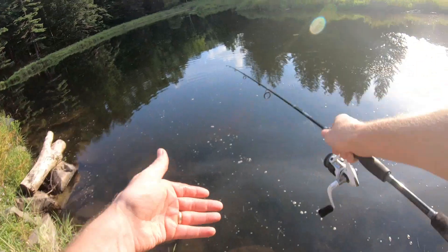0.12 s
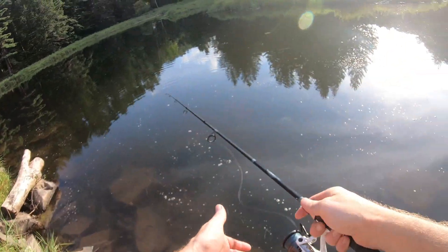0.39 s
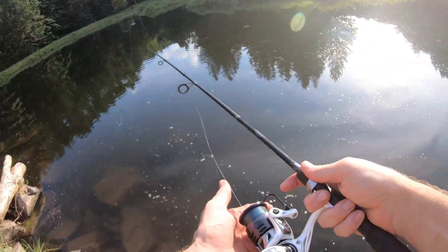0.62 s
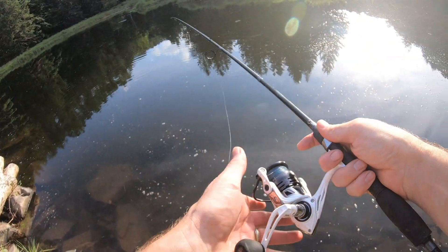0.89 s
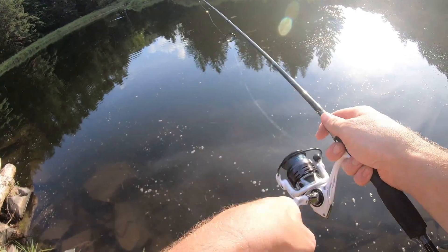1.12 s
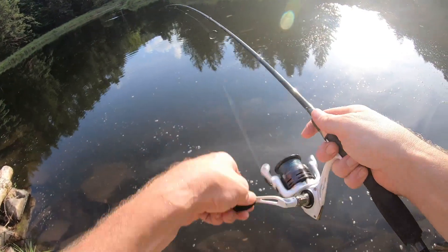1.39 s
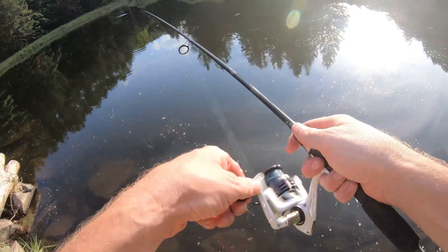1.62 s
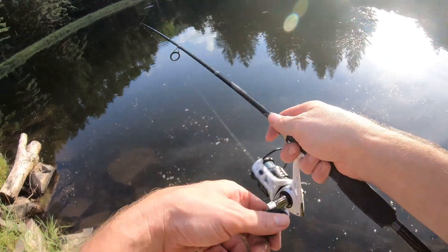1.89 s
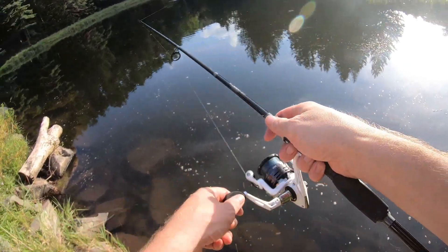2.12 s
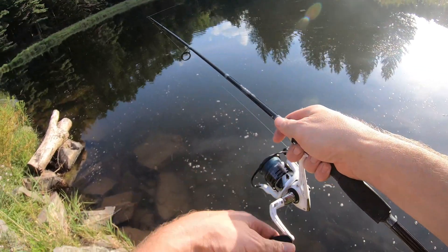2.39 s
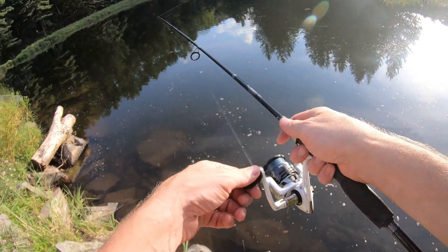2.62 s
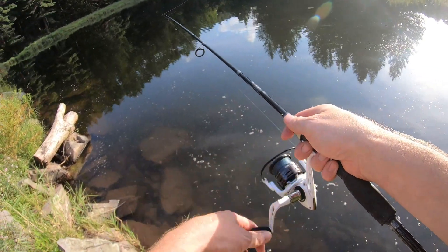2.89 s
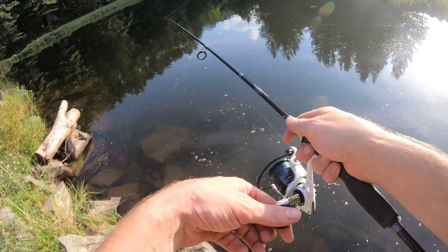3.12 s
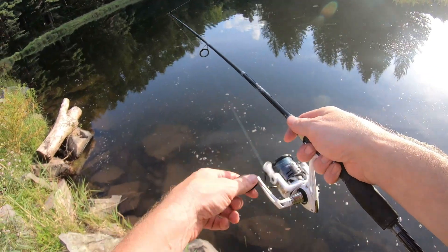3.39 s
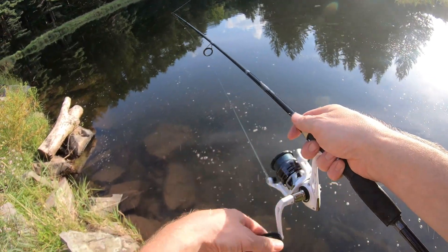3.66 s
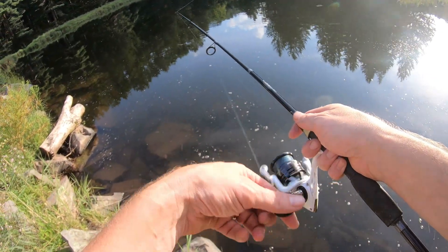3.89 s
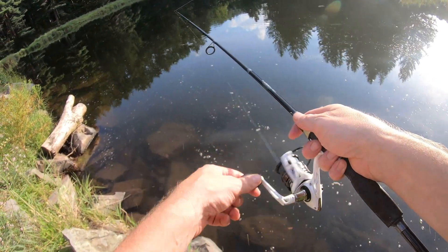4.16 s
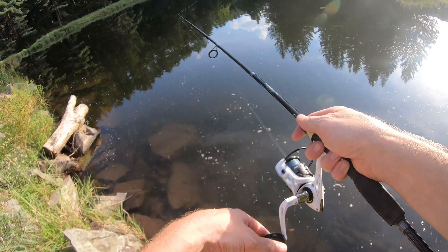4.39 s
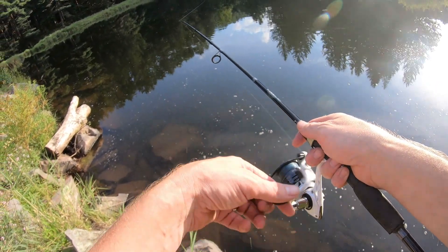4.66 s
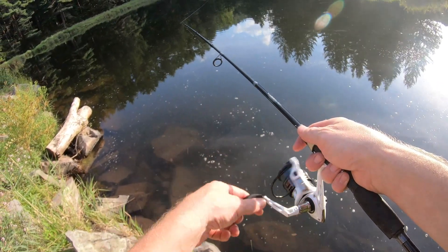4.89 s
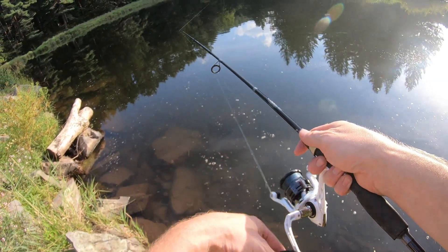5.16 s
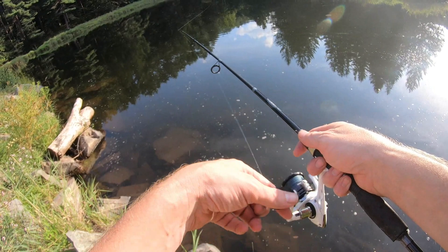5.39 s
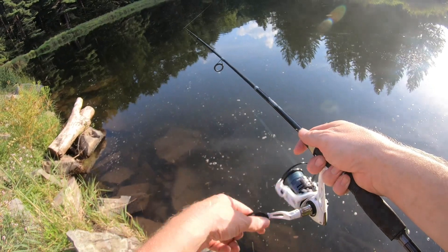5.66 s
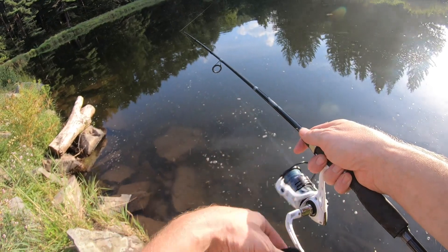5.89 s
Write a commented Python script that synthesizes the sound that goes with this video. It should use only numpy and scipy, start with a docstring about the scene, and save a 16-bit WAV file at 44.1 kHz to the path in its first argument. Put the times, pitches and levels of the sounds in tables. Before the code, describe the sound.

A close, slightly muffled stereo pickup worn by an angler at a quiet pond. Soft line hiss and small clicks lead to a hard cluster of bail clacks and a dull thump on the housing. Slack line scrapes over the roller, the handle snaps a few times, and the reel settles into steady rough whirring. Tiny drops plink on the water later, over pulsing high insect song and a low far hum.

```python
"""Still water: insects throb high up and a far engine hums, as narrow tones and shaped noise, amid background noise
and cloth rub. An angler lets hissing line run off a spinning reel, then the bail squeaks and snaps shut in noisy clicks,
with thumps on the body-worn housing made of decaying modes. Slack line rasps over the roller in gliding bands as
winding begins. Gears and line roller whirr on to the end as rubbing grains through the reel's modes, while parts tick
and, from the middle on, drops fall on the water as short tones rising in pitch."""
import sys
import numpy as np
from scipy import signal
from scipy.fft import rfft, irfft
from scipy.io import wavfile

SR = 44100
rng = np.random.default_rng(int(sys.argv[2]) if len(sys.argv) > 2 else 0)


def transcribe(signal):
    """Save signal, clipped to [-1, 1], as a 16-bit WAV file at the path in sys.argv[1]."""
    frames = np.atleast_2d(signal).T
    limited = np.clip(frames, -1, 1)
    pcm = np.round(limited * 32767).astype(np.int16)
    wavfile.write(sys.argv[1], SR, pcm)


def amplitude_ratio(level_db):
    """Convert a level in decibels to the matching linear amplitude (field) ratio."""
    exponent = np.asarray(level_db, float) / 20
    return 10 ** exponent


N = 265923
T = np.arange(N) / SR
HZ = np.maximum(np.fft.rfftfreq(N, 1 / SR), 1)


def rms_one(x):
    """Scale to unit rms."""
    return x / np.sqrt(np.mean(x ** 2) + 1e-20)


def in_time(rows):
    """Columns of a table as signals, straight between rows and held beyond the ends."""
    s, *columns = np.transpose(rows)
    return [np.interp(T, s, c) for c in columns]


def at_hz(points):
    """A spectrum table on the FFT grid, straight in log frequency."""
    hz, value = np.transpose(points)
    return np.interp(np.log(HZ), np.log(np.maximum(hz, 1)), value)


def noise(spectrum, count=2):
    """Unrelated noises of one colour, rms 1."""
    white = rng.standard_normal((count, N))
    return rms_one(irfft(rfft(white) * amplitude_ratio(at_hz(spectrum)), N))


def drift(rate):
    """Slow chance of spread about 1, with 2 * rate new values a second joined by straight lines."""
    steps = rng.standard_normal(400)
    return np.interp(T * rate * 2, np.arange(400), steps) * 1.22  # makes up for the spread lost between steps


def resonance(x, hz, width_hz):
    """Two-pole peak with gain about 1 on top."""
    r = np.exp(-np.pi * width_hz / SR)
    feedback = [1, -2 * r * np.cos(2 * np.pi * hz / SR), r * r]
    return signal.lfilter([(1 - r * r) / 2, 0, (r * r - 1) / 2], feedback, x)


def twice_resonant(x, hz, width_hz):
    """The same peak twice in a row, for steeper skirts."""
    return resonance(resonance(x, hz, width_hz), hz, width_hz)


def wavering(hz, width_hz):
    """Two narrow noises whose centre follows hz, rms 1."""
    band = signal.lfilter([1], [1, -np.exp(-np.pi * width_hz / SR)], rng.standard_normal((2, 2, N)))
    phase = 2 * np.pi * np.cumsum(hz) / SR
    return rms_one(band[0] * np.cos(phase) + band[1] * np.sin(phase))


def dull(x, cut_hz=9300, leak_db=-43.0):
    """The housing's membranes cut the top steeply, leaving a small leak."""
    return signal.sosfilt(signal.butter(6, cut_hz, fs=SR, output="sos"), x) + amplitude_ratio(leak_db) * x


def add(out, s, sound, left_right_db):
    """Place a short sound, panned by level."""
    i = round(s * SR)
    sound = sound[..., :N - i]
    out[:, i:i + sound.shape[-1]] += sound * amplitude_ratio(np.array([[left_right_db / 2], [-left_right_db / 2]]))


# colour of the background noise: (frequency [Hz], relative level [dB])
BACKGROUND_COLOUR = [(20, -36), (60, -39), (200, -20), (500, -16.5), (900, -7.5), (2000, -13.5),
                     (4500, -16.5), (8000, 1.5), (9500, -23), (11000, -65.5), (16000, -70)]


def background_noise():
    """Steady background noise, strongest near 8 kHz."""
    return amplitude_ratio(-67) * noise(BACKGROUND_COLOUR)


# engine orders that fade as two paths through the air fall in and out of step:
# (order [x firing rate], level [dB], fading period [s], time of fullest level [s], fading depth [0-1])
ENGINE_ORDERS = [(2, -68.5, 5.6, 2.8, 0.22), (3, -70.5, 2.8, 4.32, 0.25), (5, -69, 5.8, 0.33, 0.46),
                 (6, -67, 2.44, 2.12, 0.2)]
# weaker engine lines without that fading: (frequency [Hz], level [dB])
ENGINE_LINES = [(72.15, -82), (180.4, -85), (486, -78.5), (505, -85)]
# common swell and sink of the orders above the third: (time [s], added level [dB])
UPPER_ORDERS = [(0, 6), (.7, 3.5), (1.3, -6), (2.1, 0), (3.1, -2), (4.0, -15), (4.8, -6.5), (5.7, -2.5),
                (6.03, -0.5)]


def engine(firing_hz=72.15, waver_db=2.5):
    """Tones of a far engine at fixed pitch; each wavers in level as the air between moves."""
    upper_db, = in_time(UPPER_ORDERS)
    lines = list(ENGINE_LINES)
    for order, db, period_s, fullest_s, depth in ENGINE_ORDERS:
        second_path = np.clip(depth, 0, .97) * np.exp(2j * np.pi * (T - fullest_s) / period_s)
        fading_db = 20 * np.log10(np.abs(1 + second_path) / (1 + depth))
        lines.append((firing_hz * order, db + (order > 4) * upper_db + fading_db))
    out = np.zeros((2, N))
    for hz, db in lines:
        waver = waver_db * np.array([drift(3), drift(2.3)])  # the two ports waver apart
        tone = np.sin(2 * np.pi * hz * T + rng.uniform(0, 2 * np.pi))
        out += np.sqrt(2) * amplitude_ratio(db + waver) * tone
    return out


# bands of the far insects: (centre [Hz], width [Hz], relative level [dB])
CHORUS_BANDS = [(5697, 540, 1), (8180, 750, 2.5)]


def far_chorus(level_db=-62.5, flicker_db=1.4):
    """Many far singers blur into noise bands whose levels flicker a little."""
    white = rng.standard_normal((2, N))
    chorus = np.zeros((2, N))
    for hz, width_hz, db in CHORUS_BANDS:
        chorus += amplitude_ratio(db + flicker_db * drift(15)) * rms_one(twice_resonant(white, hz, width_hz))
    return dull(amplitude_ratio(level_db) * chorus)


# the near singer's loudness: (time [s], level [dB])
NEAR_SINGER = [(0.0, -59), (0.6, -65), (0.95, -56), (1.26, -68.5), (1.9, -60.5), (2.92, -69.5), (3.79, -67),
               (4.35, -62), (6.03, -62)]


def near_insect(centre_hz=8570, fall_hz=390, width_hz=80, duty=.13, flicker_db=2.2):
    """A near singer pulses about twenty times a second, each pulse a narrow noise falling in pitch."""
    near_db, = in_time(NEAR_SINGER)
    pulses_per_s, first_pulse_s = 19.48, .031
    waver_pulses, waver_period_s, fastest_s = .34, 4.2, .35  # the pace wavers slowly about its mean
    waver = waver_pulses * np.sin(2 * np.pi * (T - fastest_s) / waver_period_s)
    pulses = pulses_per_s * (T - first_pulse_s) + waver
    turn = (pulses + .5) % 1 - .5  # -0.5 to 0.5 through each pulse, 0 at its middle
    gate = np.exp(-.5 * (turn / duty) ** 2) * amplitude_ratio(flicker_db * drift(11))
    song = wavering(centre_hz - 2 * fall_hz * turn, width_hz)
    return dull(amplitude_ratio(near_db) * rms_one(gate * song))


# how hard the cloth rubs: (time [s], level [dB])
CLOTH_LEVEL = [(0.0, -60), (0.4, -54), (0.79, -51), (0.98, -59.5), (1.5, -62.5), (3.88, -65), (4.72, -61.5),
               (6.03, -65)]
# colour of the cloth rub: (frequency [Hz], relative level [dB])
CLOTH_COLOUR = [(20, -22), (70, -6), (110, -21), (170, 5.5), (230, -5.5), (350, -11.5), (700, -10),
                (1500, -18), (4000, -44)]


def cloth():
    """Cloth rubbing on the housing: low coloured noise of uneven level."""
    level_db, = in_time(CLOTH_LEVEL)
    return amplitude_ratio(level_db + 1.2 * drift(8)) * noise(CLOTH_COLOUR)


# knocks through the harness: (time [s], level [dB], upper modes' added level [dB], left-right [dB])
THUMPS = [(0.259, -44.5, -5, -5), (0.567, -52, -17, 3), (0.773, -49, 16.5, -0.5), (0.882, -23.5, 2.5, 2.5),
          (0.896, -27, -3.5, -8), (0.984, -54, -15, -1), (1.233, -56, 12, -1.0), (1.287, -56.5, 7.5, 4),
          (1.562, -53.5, -19, 4), (1.664, -59, -2, -14), (1.803, -54, 1.5, -3), (2.153, -56, -2, 0.5),
          (2.36, -57, 1, -16), (3.07, -58, -16, -18), (3.771, -64, 0, -17)]
# low and upper modes of the housing: (frequency [Hz], relative level [dB], 60 dB decay [s])
HOUSING_LOW = [(29.8, -3.5, .18), (44, -1, .14), (71, -7, 0.12), (95, -4.5, 0.16)]
HOUSING_HIGH = [(164, -10.5, 0.075), (221.5, 5, 0.05), (303.6, -7, 0.11), (383, -14, 0.053),
                (686, -10.5, 0.036)]


def thumps(push_ms=3.8, unlike_rad=1.6):
    """Soft pushes on the housing ring its low and upper modes, in different phase at each port."""
    out, t = np.zeros((2, N)), T[:12000]
    for s, db, high_db, left_right_db in THUMPS:
        modes = HOUSING_LOW + [(hz, d + high_db, t60) for hz, d, t60 in HOUSING_HIGH]
        swell = 1 - np.exp(-t * 1000 / push_ms)
        ring = np.zeros((2, len(t)))
        for hz, mode_db, t60 in modes:
            phase = unlike_rad * rng.uniform(0, 1, (2, 1))
            ring += amplitude_ratio(mode_db - 60 * t / t60) * np.sin(2 * np.pi * hz * t + phase)
        add(out, s, amplitude_ratio(db) * swell * ring, left_right_db)
    return out


# drops on the water: (time [s], level [dB], bubble pitch [Hz], passed on the way up)
DROPS = [(2.428, -52, 482), (3.235, -52, 640), (3.834, -56, 1400), (3.88, -70, 479), (3.924, -63, 1444),
         (4.024, -57, 1627), (4.072, -53, 1440), (4.116, -55, 1410), (4.166, -52, 1538), (4.339, -56, 1292),
         (4.606, -57, 1570), (5.01, -50, 639), (5.179, -52, 1660)]


def drops(cycles_at_1400=16.82, rise=0.48):
    """Each trapped bubble rings some cycles and dies away, rising in pitch from three quarters of its table pitch."""
    out, t = np.zeros((2, N)), T[:4000]
    for s, db, hz in DROPS:
        turns = hz * t
        cycles = cycles_at_1400 * np.sqrt(hz / 1400)  # big bubbles ring for fewer cycles
        phase = 2 * np.pi * turns * (0.75 + rise * turns / cycles)
        envelope = np.minimum(turns / 2, 1) * np.exp(-3 * turns / cycles)
        # 2.5 dB makes up for the decay during the onset
        add(out, s, amplitude_ratio(db + 2.5) * np.sin(phase) * envelope, -2.0)
    return out


# the bail spring's squeak: (time of peak [s], level [dB], pitch [Hz], spread of the bell [s])
SQUEAK = (.727, -56, 3800, .008)


def squeak():
    """The bail spring gives one short tone under a bell-shaped swell, its pitch edging up."""
    out, t = np.zeros((2, N)), T[:4000]
    s, db, hz, spread_s = SQUEAK
    bell = np.exp(-.5 * ((t - 3 * spread_s) / spread_s) ** 2)
    tone = np.sin(2 * np.pi * hz * t * (1 + .4 * t))
    add(out, s - 3 * spread_s, amplitude_ratio(db) * bell * tone, -4.0)
    return out


# ticks of bail, roller and handle:
# (time [s], level [dB], centre [Hz], bright snap over click [dB], left-right [dB])
TICKS = [(0.182, -43, 1200, -15, -7), (0.3729, -38.5, 1770, 4, 7), (0.3832, -38, 2810, -6, 5),
         (0.4402, -43, 2330, -13, 5), (0.4513, -41.5, 2640, -10, 6), (0.633, -39, 3300, -17, -4),
         (0.7593, -23.5, 3620, 15.5, -9.5), (0.7712, -15.5, 4220, -3, -8), (0.7729, -19, 3050, 7.5, -9),
         (0.7773, -29.5, 1190, 4, -11.5), (0.7867, -25, 3640, 0, -2), (0.791, -29, 3450, 5.5, 2),
         (0.808, -34, 3890, -2, -6), (0.8424, -48.5, 1020, 6, -13), (0.8453, -27.5, 3950, -10, -8.5),
         (0.879, -41, 1530, 3, -13), (0.8829, -31, 870, 2.5, 0), (0.8887, -24, 2050, -5, -10),
         (0.8953, -23.5, 1890, -6, 7.5), (0.9068, -32.5, 1870, 7, -7), (0.9395, -45.5, 1220, -10, -2),
         (0.9886, -40, 3680, -13, -4.5), (0.9953, -31, 3470, -17, -7), (1.019, -44.5, 1680, 7.5, -9),
         (1.0775, -40, 3540, -5, -9), (1.241, -48, 1740, 8, -11), (1.3814, -25, 2940, -54, -5),
         (1.6482, -45, 2850, -7, -8), (1.6982, -30.5, 2760, -25, -4), (1.8012, -31.5, 2840, -18, -3),
         (1.8476, -22.5, 3940, -10, -8), (2.349, -36, 1980, -9, 4), (2.4607, -44, 1840, -13, -6),
         (3.2291, -41.5, 3130, -16, -3), (3.6084, -43, 2220, -18, 1), (4.0178, -36, 4940, -31, 1),
         (4.067, -40.5, 4930, -12, -6), (4.2584, -45, 2440, -11, -2), (4.689, -46, 3200, -13, 3),
         (5.0668, -39, 2200, -32, -2), (5.3108, -37, 3320, -23, 4), (5.7215, -37, 3660, -17, 1),
         (5.7651, -43.5, 3140, -16, 1), (5.809, -40.5, 3636, -20, 5), (5.8924, -43, 4650, -17, -3.5)]
# modes of reel frame and spool, also rung by the gears: (frequency [Hz], width [Hz], relative level [dB])
REEL_MODES = [(1228, 220, -5), (1866, 150, -7), (2440, 120, -8.5), (2827, 89, -9), (3140, 87, -3),
              (3940, 3600, -8), (5246, 280, 4.5), (7060, 1370, 4)]


def ticks(sharpness=2.05, modes_db=-9.0, spread_octaves=1.0, snap_hz=7200, snap_width_hz=2500):
    """A short noisy contact: a broad click at its own centre, a bright snap, and the nearest reel modes ringing on."""
    fade_db_per_ms, linger_per_db = 8.5, 0.55  # bright, rattling contacts last longer for each dB of snap
    out, t = np.zeros((2, N)), T[:1500]
    for s, db, centre_hz, snap_db, left_right_db in TICKS:
        white = rng.standard_normal((2, len(t)))
        white[1] = .85 * white[0] + .5 * white[1]  # the ports hear partly different bursts
        fade_db = max(fade_db_per_ms - linger_per_db * snap_db, 3)
        contact = white * amplitude_ratio(-1000 * fade_db * t) * np.minimum(t * SR / 8, 1)
        contact[:, 4] += 4  # the first touch is a hard click
        soften = signal.butter(2, min(1.75 * centre_hz, 9000), fs=SR, output="sos")
        soft = signal.sosfilt(soften, contact)
        width_hz = centre_hz / sharpness
        ring = resonance(resonance(soft, centre_hz, 2 * width_hz), centre_hz, width_hz)
        for k, (hz, mode_width_hz, _) in enumerate(REEL_MODES):
            near = np.exp(-.5 * (np.log2(hz / centre_hz) / spread_octaves) ** 2)
            ring = ring + amplitude_ratio(modes_db) * near * resonance(soft, hz, mode_width_hz) * (-1) ** k
        snap = resonance(resonance(contact, snap_hz, 2 * snap_width_hz), snap_hz, snap_width_hz)
        tick = ring / np.abs(ring).max() + amplitude_ratio(snap_db) * snap / np.abs(snap).max()
        add(out, s, amplitude_ratio(db) * tick, left_right_db)
    return dull(out, cut_hz=10040, leak_db=-14.0)


# slack line dragged over the roller as winding begins: (time [s], main resonance [Hz], level [dB])
SLACK = [(1.36, 2173, -77), (1.448, 2480, -62.5), (1.586, 2230, -65), (1.664, 2600, -70.5),
         (1.73, 2503, -57), (1.868, 2146, -60), (2.03, 2000, -66.5), (2.2, 1770, -68)]


def slack_line(width_hz=260, flicker_db=5.1):
    """Rough resonances glide together with the line's tension, faint before and after the drag."""
    hz, db = in_time(SLACK)
    rough = np.zeros((2, N))
    # (pitch ratio, relative level [dB])
    for ratio, band_db in ((.8, -4.0), (1.0, 0.0), (1.36, -6.0), (2.1, -7.0)):
        rough += amplitude_ratio(band_db + flicker_db * drift(30)) * wavering(ratio * hz, width_hz)
    return dull(amplitude_ratio(db) * rough, cut_hz=6700)


def line_hiss():
    """Bright hiss of unsteady level, strongest near 9.5 kHz."""
    # (frequency [Hz], relative level [dB])
    colour = [(8000, -13), (9500, 3.5), (11000, -6.5), (15500, -10), (16500, -52)]
    return noise(colour) * amplitude_ratio(3.4 * drift(10))


def roller_whistle(hz=7600, width_hz=600):
    """The line roller whistles: a resonant noise band that flickers in level."""
    white = rng.standard_normal((2, N))
    return rms_one(twice_resonant(white, hz, width_hz)) * amplitude_ratio(2.2 * drift(18))


# colour of the broad rub under the modes: (frequency [Hz], relative level [dB])
RUB_COLOUR = [(300, -41), (700, -0.5), (1200, -3.5), (2000, -3.5), (3500, -2.5), (5000, -4), (8000, -1.5),
              (9500, -18), (11000, -58)]


def gear_rub(modes_db=-1.0, patchy_db=2.5, grain_db=5.5, grains_per_s=600, grit_db=24.5, grit_per_s=45.0):
    """Dense rubbing grains excite the reel's modes, each patchy in level, over a broad rub."""
    grain_size = rng.standard_normal(N)[(T * grains_per_s).astype(int)]  # each held for one grain
    grains = rng.standard_normal((2, N)) * amplitude_ratio(grain_db * grain_size)
    catches = rng.random(N) < grit_per_s / SR  # now and then a gear tooth catches
    grains = grains + amplitude_ratio(grit_db) * catches * rng.standard_normal(N)
    modes = np.zeros((2, N))
    for k, (hz, width_hz, db) in enumerate(REEL_MODES):
        ring = twice_resonant(grains, hz, width_hz) / np.sqrt(width_hz)
        modes += amplitude_ratio(db + patchy_db * drift(12)) * ring * (-1) ** k
    return amplitude_ratio(modes_db) * rms_one(modes) + noise(RUB_COLOUR)


# line and gears rubbing: (time [s], gear whirr drive [dB], line hiss level [dB])
WINDING = [(0.0, -70, -74), (0.34, -61, -69.5), (0.56, -67.5, -90), (0.76, -61.5, -99), (0.9, -58.5, -67),
           (1.01, -68, -70), (1.1, -80, -77), (1.3, -65, -98), (1.5, -66, -82), (1.78, -56, -67.5),
           (2.1, -59, -79), (2.55, -63, -80), (2.97, -60.5, -76), (3.3, -63, -84.5), (3.88, -63.5, -83),
           (4.2, -60.5, -81), (4.9, -62, -77.5), (5.36, -63.5, -99), (5.65, -61, -76), (6.03, -63.5, -101)]


def whirr(rotor_per_s=17, beat_db=2.5):
    """Gears, roller and line at work; the load on gears and roller swells once per rotor beat."""
    whirr_db, hiss_db = in_time(WINDING)
    # the whistle is at -61.5 dB when the whirr drive is too, and rises 1.7 dB for each dB of whirr
    roller_db = -61.5 + 1.7 * (whirr_db + 61.5)
    pace = rotor_per_s * (1 + 0.06355 * drift(0.98))
    beat = amplitude_ratio(beat_db * np.cos(2 * np.pi * np.cumsum(pace) / SR))
    turning = amplitude_ratio(whirr_db) * gear_rub() + amplitude_ratio(roller_db) * roller_whistle()
    return dull(turning * beat) + amplitude_ratio(hiss_db) * line_hiss()


# two microphone ports, level: (frequency [Hz], left-right [dB])
PORT_BALANCE = [(60, -0.5), (110, -1.0), (200, 0.2), (380, 0.5), (700, -1.0), (1290, -3.0), (2380, -3.5),
                (4400, -8.0), (8120, -4.0), (15000, -3.0)]
# two microphone ports, phase: (frequency [Hz], lead of the left [rad])
PORT_LEAD = [(0, -1.5), (780, 4), (2150, 0.5), (3010, -0.5), (5000, -1.4), (5770, -2), (7150, 0.2),
             (8440, 1), (10100, -13), (12200, -18), (15400, 31), (16500, 11.6)]
# two microphone ports, shared sound: (frequency [Hz], likeness [0-1])
PORT_LIKENESS = [(60, 1), (230, 0.041), (400, 1), (580, 0.45), (800, 0.55), (1400, 0.33), (2500, 0.59),
                 (3200, 0.69), (4200, 0.56), (5200, 0.78), (6200, 0.49), (7300, 0.32), (8000, 0.045),
                 (8500, 0.45), (10000, 0.19), (14000, .2)]


def ports(pair):
    """The right port hears the left one's sound shifted in phase, mixed with an unrelated share."""
    alike = np.clip(at_hz(PORT_LIKENESS), 0, 1)
    lead = np.interp(HZ, *np.transpose(PORT_LEAD))
    direct, diffuse = rfft(pair)
    right = alike * direct * np.exp(-1j * lead) + np.sqrt(1 - alike ** 2) * diffuse
    side = amplitude_ratio(at_hz(PORT_BALANCE) / 2)
    return irfft(np.array([direct * side, right / side]), N)


def scene():
    """Continuous sounds pass the two ports; short ones carry their own direction."""
    surroundings = background_noise() + engine() + far_chorus() + near_insect() + cloth()
    reel = slack_line() + whirr()
    return ports(surroundings + reel) + thumps() + drops() + squeak() + ticks()


def band_limit(x):
    """A steep low-pass at the top of the band."""
    return signal.sosfilt(signal.butter(12, 16850, fs=SR, output="sos"), x)


def record(dry):
    """A steep low-pass takes off the top of the finished mix."""
    mix = signal.sosfilt(signal.cheby2(10, 40, 16700, fs=SR, output="sos"), dry)
    return band_limit(mix)


dry = scene()
out = record(dry)
transcribe(out)
```